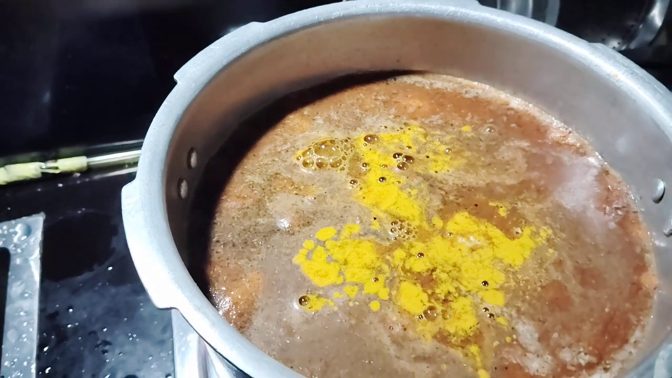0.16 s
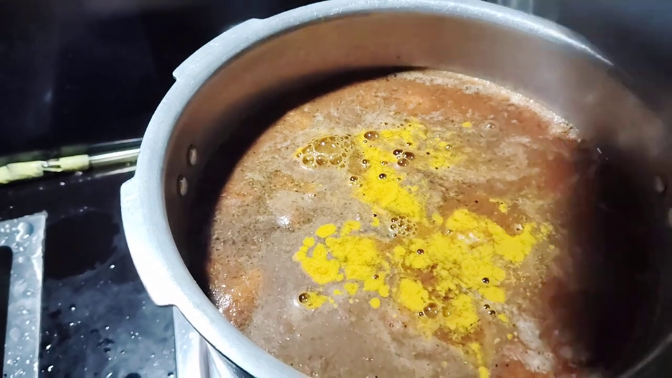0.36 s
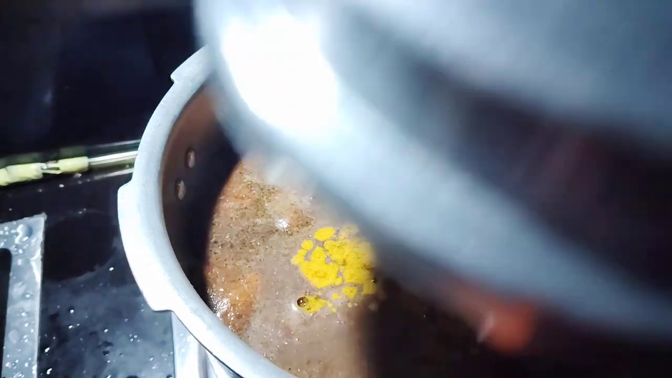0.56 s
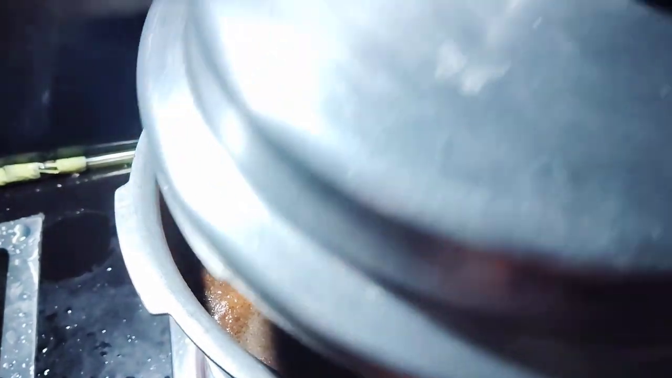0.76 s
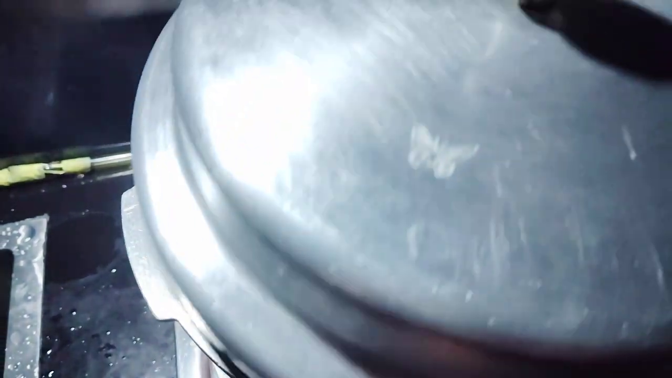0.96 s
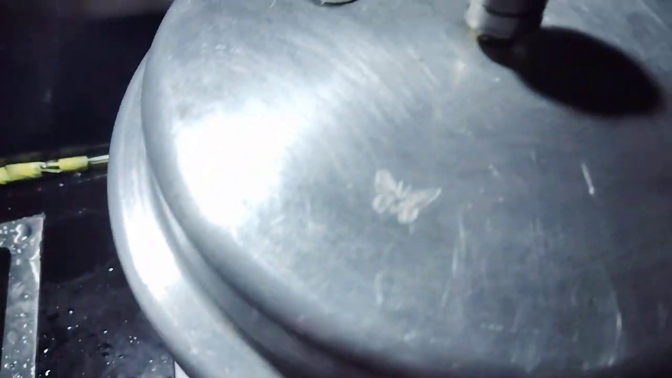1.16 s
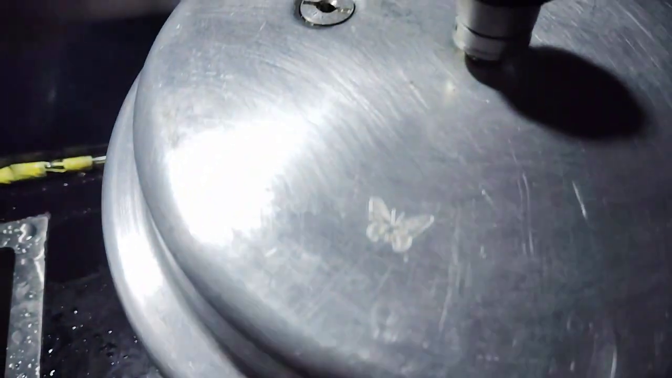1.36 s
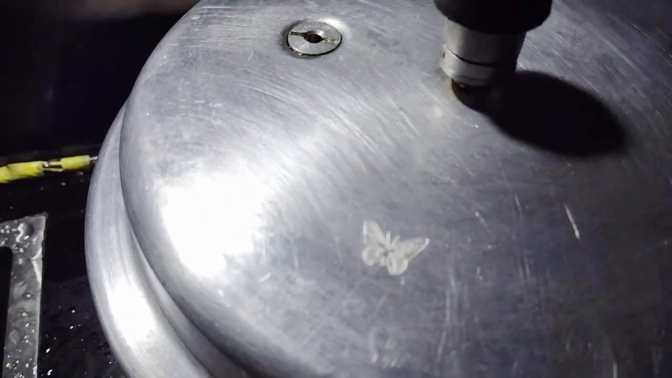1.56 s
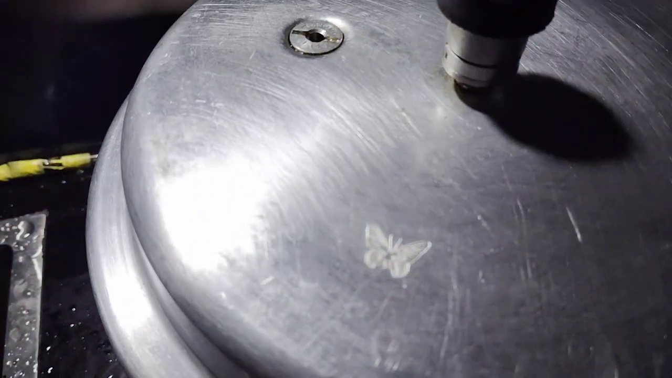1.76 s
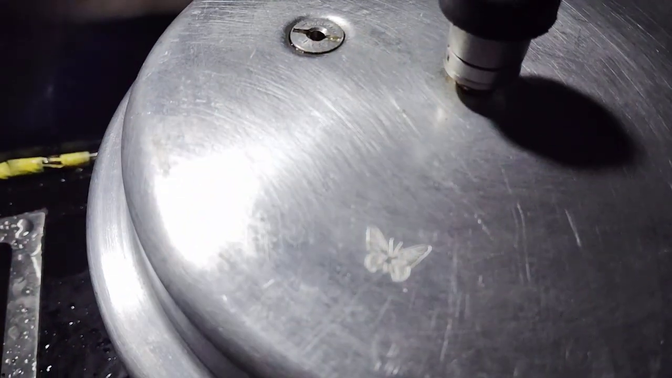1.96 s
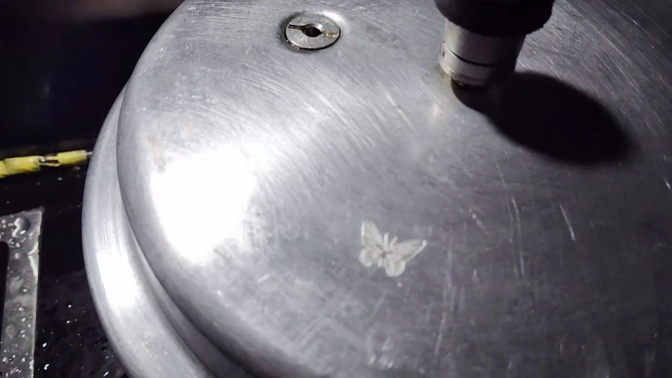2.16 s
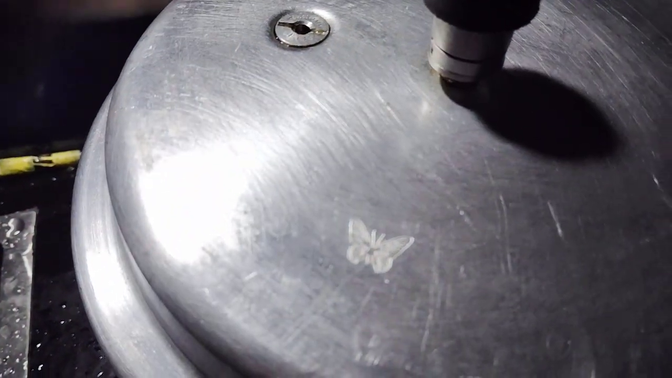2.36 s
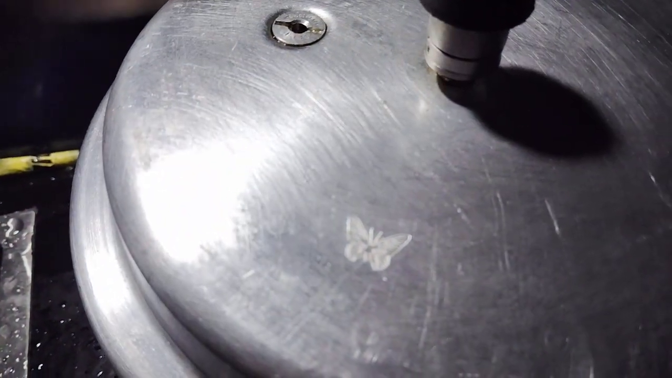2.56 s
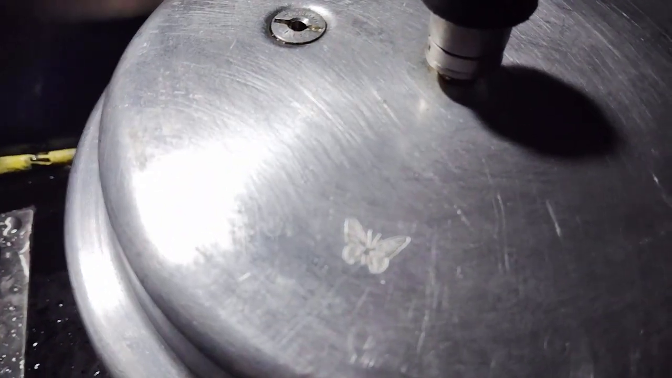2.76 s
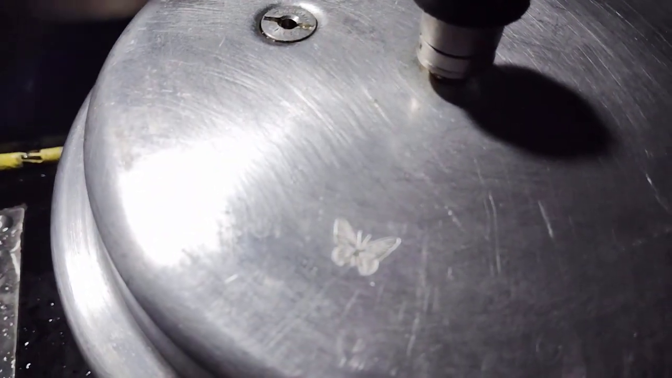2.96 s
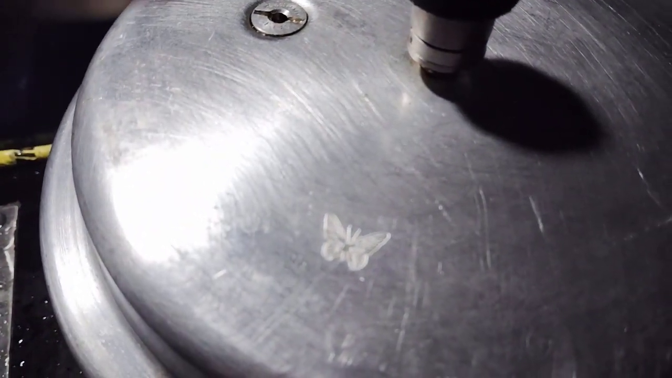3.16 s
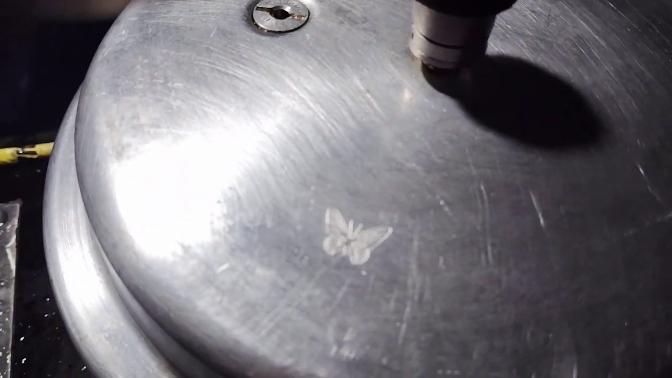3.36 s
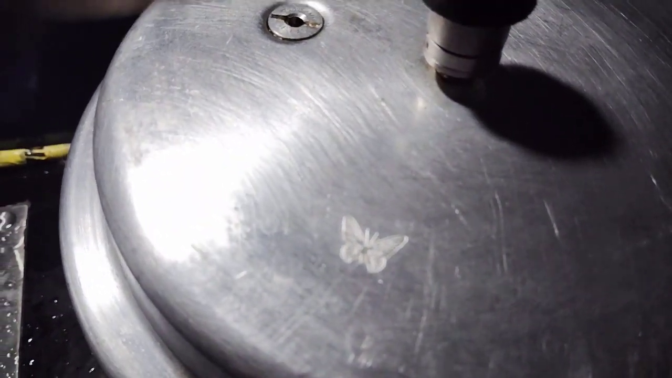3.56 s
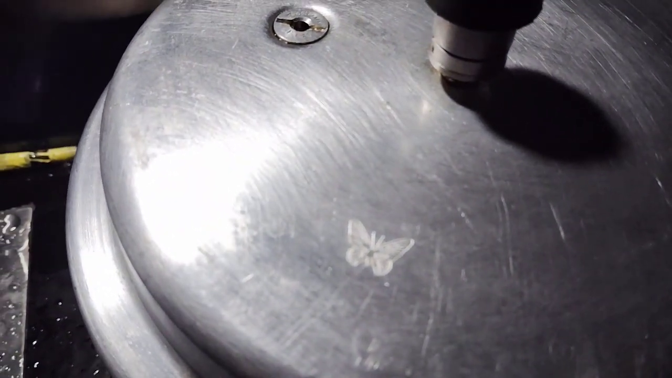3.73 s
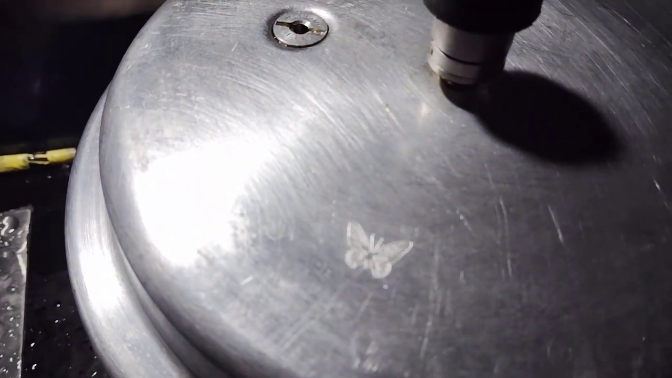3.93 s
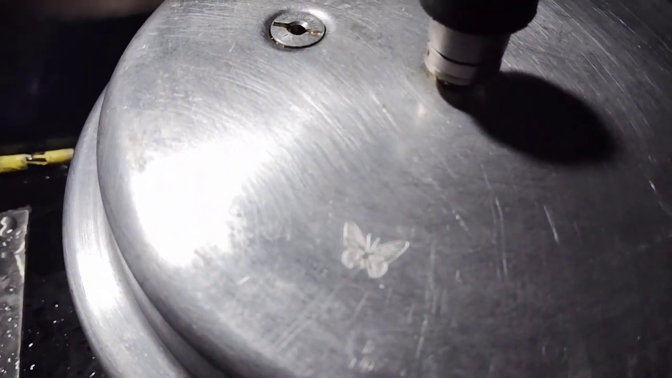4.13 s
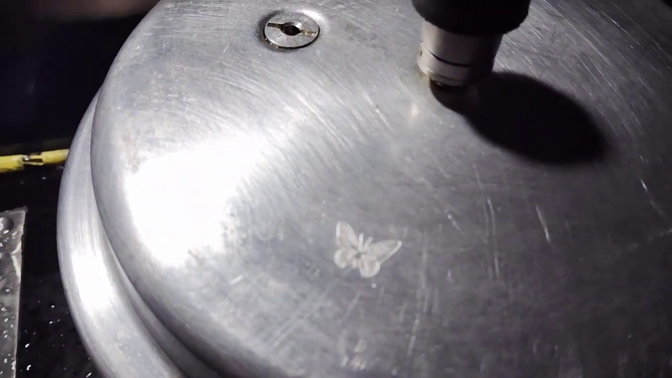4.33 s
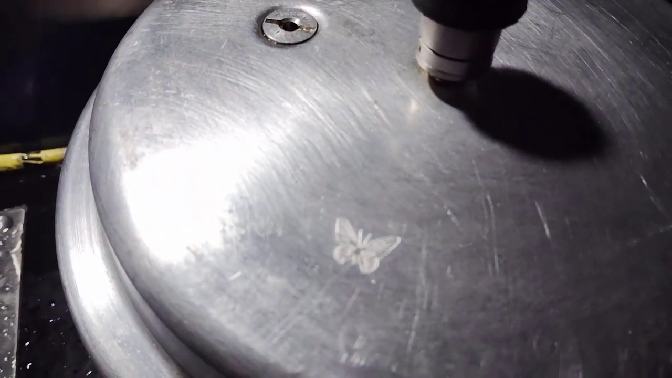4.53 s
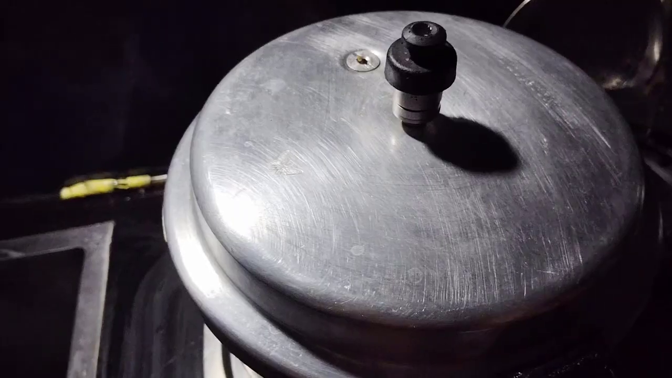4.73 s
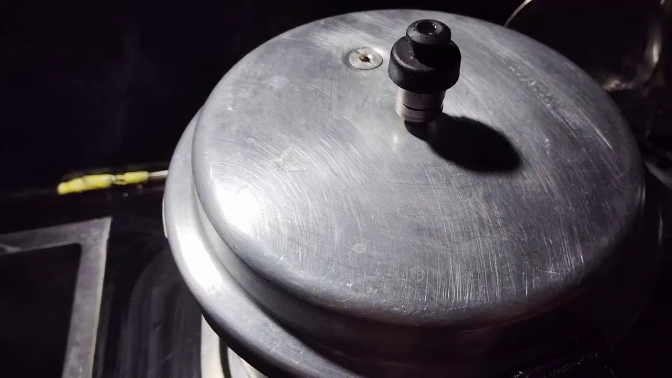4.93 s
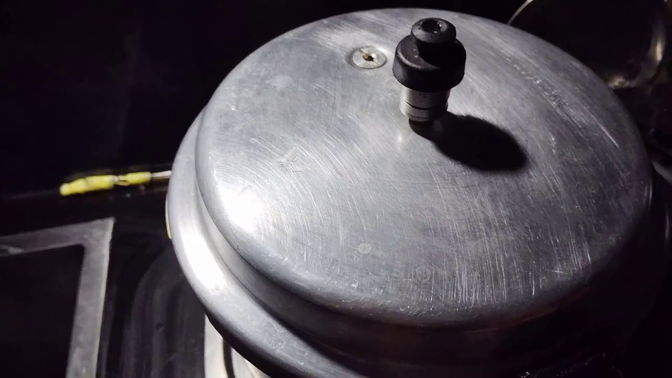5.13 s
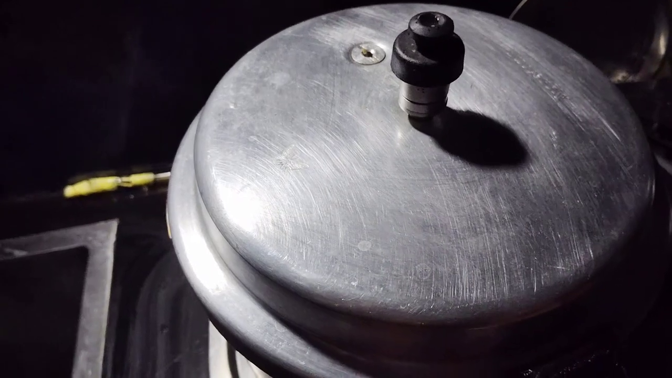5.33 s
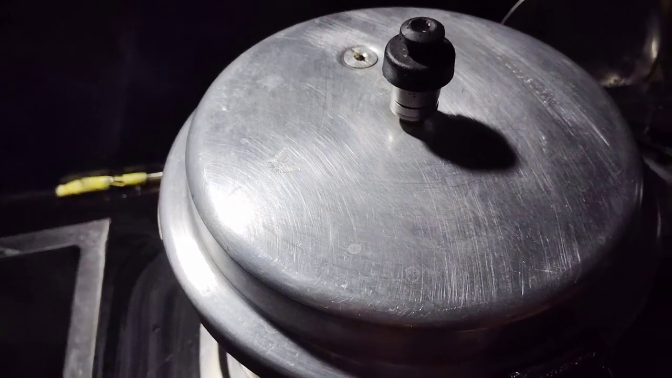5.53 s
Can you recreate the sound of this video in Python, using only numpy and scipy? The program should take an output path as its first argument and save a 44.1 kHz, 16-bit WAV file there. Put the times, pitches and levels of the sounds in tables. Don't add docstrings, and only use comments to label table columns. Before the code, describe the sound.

A close microphone in a small, hard kitchen hears steady burner hiss, low murmur and faint metallic crackle. Distant utensils knock lightly from 0.25 s, and a dull thump booms through the worktop near 0.37 s. At 1.03 s a steel lid strikes a full pot in a rapid, damped clatter, then rocks with low wavering tones and a grinding rumble. At 1.4 s it seats with the loudest clank, dome and rim ringing briefly. A sharp click at 1.76 s starts a thin, gritty turning scrape, with more clicks until about 2.4 s. Soft thumps boom at 2.07, 3.17, 3.58 and 4.11 s, among dull and bright utensil knocks, one ringing longer at 3.8 s. Sound cuts to silence at 4.28 s. From 4.6 s a much quieter, duller room fades in, with weak hiss, low boom, tiny ticks and faint knocks until about 5.6 s.

```python
import sys
import numpy as np
from scipy import signal
from scipy.fft import rfft, irfft, next_fast_len
from scipy.io import wavfile
from scipy.ndimage import uniform_filter1d

SR = 44100
rng = np.random.default_rng(int(sys.argv[2]) if len(sys.argv) > 2 else 0)


def unload_audio(sound):
    columns = np.transpose(np.atleast_2d(sound))
    steps = np.round(np.clip(columns, -1, 1) * 32767)
    wavfile.write(sys.argv[1], SR, steps.astype(np.int16))


def ratio(d):
    e = np.asarray(d, float) / 20
    return 10 ** e


N = 246735
TIME = np.arange(N) / SR

# start in [s], clank level in [dB], dome blow level in [dB],
# rim tick level in [dB], clank pitch in [Hz].
CONTACTS = [(1.0330, -20.5, -19.5, -42.5, 1243), (1.0377, -13.5, -29, -23.5, 1616),
            (1.0377, -13, -20.5, -27.5, 757), (1.0415, -16, -27, -25, 700), (1.0495, -21, -35.5, -39, 600),
            (1.0512, -23, -40.5, -27.5, 604), (1.061, -30, -39.5, -45.5, 525.6),
            (1.0731, -30, -37, -33.5, 640), (1.1340, -34, -37.5, -59, 1240),
            (1.192, -30, -33.5, -52.5, 1160), (1.343, -28, -34, -57, 1272), (1.354, -28, -33.5, -61, 650),
            (1.4, -40, -30.5, -41, 1500), (1.4015, -10.5, -10.5, -18, 1283),
            (1.4033, -18.5, -16.5, -22.5, 887), (1.411, -17, -15.5, -29.5, 836),
            (1.415, -20, -21.5, -23.5, 1100), (1.4210, -21.5, -33, -30.5, 895),
            (1.426, -23.5, -22, -32, 613), (1.438, -35.5, -26.5, -32.5, 1000)]
# start in [s], peak level in [dB].
THUMPS = [
    (0.366, -22),
    (2.065, -24.5),
    (3.172, -24.5),
    (3.579, -24),
    (4.111, -25.5),
]


def level(x, db):
    return x * ratio(db) / np.sqrt(np.mean(x ** 2))


def band(x, low_hz, high_hz):
    return signal.sosfilt(signal.butter(2, [low_hz, min(high_hz, 0.45 * SR)], "band", fs=SR, output="sos"), x)


def decay(after, t60):
    return np.exp(-np.log(1000) * after / t60)


def walk(rate):
    k = int(SR / rate)
    steps = np.repeat(rng.standard_normal(N // k + 1), k)
    return 1.3 * uniform_filter1d(uniform_filter1d(steps, k), k)[:N]


def waver(hz, drift_hz):
    return np.sqrt(2) * np.sin(2 * np.pi * np.cumsum(hz + drift_hz * walk(14)) / SR)


def swells(rows, rise_s, t60):
    power = np.zeros(N)
    for s, hold, db in rows:
        rise = np.clip((TIME - s) / rise_s, 0, 1)
        fall = ratio(-60 * np.clip(TIME - s - rise_s - hold, 0, None) / t60)
        power += (ratio(db) * rise * fall) ** 2
    return np.sqrt(power)


def ring(push, modes):
    out = np.zeros(len(push))
    for hz, db, t60 in modes:
        pole = np.exp(2j * np.pi * hz / SR - np.log(1000) / (max(t60, 0.005) * SR))
        out += ratio(db) * signal.lfilter([0, pole.imag], [1, -2 * pole.real, abs(pole) ** 2], push)
    return out


def blows(times, db, contact_s, rattle, rattle_s):
    out = np.zeros(N)
    after = np.arange(2000) / SR
    push = np.sin(np.pi * np.clip(after / contact_s, 0, 1))
    grit = rng.standard_normal((len(times), len(after))) ** 3 * np.exp(-after / rattle_s)
    for s, gain, trail in zip(times, ratio(np.array(db)), grit):
        i = int(s * SR)
        out[i:i + len(after)] += (gain * (push / push.sum() + rattle * trail))[:N - i]
    return out


def strike(times, db, modes, spread, count):
    start, push = SR, np.zeros(SR)
    out = np.zeros(N)
    chance = rng.standard_normal((len(times), len(modes), count))
    chance = np.sign(chance) * (0.6 + 0.4 * np.abs(chance)) * 0.75 ** np.arange(count)
    detune = rng.uniform(-1.3, 1, (len(modes), count)) * (np.arange(count) > 0)
    for m, (hz, mode_db, t60) in enumerate(modes):
        for k in range(count):
            push[(times * SR).astype(int) - start] = ratio(db) * chance[:, m, k]
            out[start:2 * start] += ring(push, [(hz * (1 + spread * detune[m, k]), mode_db, t60)])
    return out


def lid_ring():
    # pitch in [Hz], level in [dB], t60 in [s].
    dome_modes = [(239.4, 0.5, 0.15), (289.4, -4, 0.22), (357.6, 1, .19), (495, -2, 0.12), (558, -12, .14),
                  (653, -8.5, 0.25), (713.5, -6, 0.075), (847, -3, 0.12), (921, -8, 0.051), (1170, -4, 0.1),
                  (1220, -5.5, 0.04), (1414, -5, 0.078), (1565, -7, 0.11), (1860, -10.5, 0.11),
                  (2085, -15, 0.16), (2205, -13, 0.16), (2450, -16.5, 0.13)]
    # pitch in [Hz], level in [dB], t60 in [s].
    rim_modes = [(3100, -5.5, 0.044), (3584, -8.5, 0.038), (4020, -11, .22), (4160, -0.5, 0.12),
                 (4330, 4.5, 0.078), (4953, -8, 0.13), (5650, -3.5, .06), (6000, -17, .05),
                 (6600, -14.5, .08), (7300, -9.5, 0.054), (8490, 1, 0.072), (8900, 0, 0.19),
                 (8870, -7.5, 0.11), (9125, -7.5, .1), (9600, -8.5, 0.065), (9700, -4.5, 0.064),
                 (10040, -6.5, .1), (10500, -14.5, 0.09), (12500, -14, 0.092), (12700, -12.5, .12),
                 (13400, -13.5, .1), (14400, -14, .12)]
    s, _, blow_db, tick_db, _ = np.transpose(CONTACTS)
    held_until_s, held_ring = 1.3, 0.55
    out = np.zeros(N)
    for group, share in [(s < held_until_s, held_ring), (s >= held_until_s, 1)]:
        held_dome = dome_modes * np.array([1, 1, (1 + share) / 2])
        held_rim = rim_modes * np.array([1, 1, share])
        out += strike(s[group], blow_db[group] - 10, held_dome, 0.035, count=3)
        out += strike(s[group], tick_db[group] - 15, held_rim, 0.045, count=5)
    return out


def lid_clank():
    out = np.zeros(N)
    impulse = np.arange(2000) == 0
    for s, db, _, _, hz in CONTACTS:
        i = int(s * SR)
        out[i:i + 2000] += ring(impulse, [(hz, db, 22 / hz), (1.4 * hz, db - 4, 22 / hz)])
    return out


def lid_wash():
    s, _, blow_db, tick_db, _ = np.transpose(CONTACTS)
    washes = [(blow_db - 18, 450, 3200, 0.17),
              (tick_db - 7.5, 2600, 11000, 0.03),
              (tick_db - 19, 8000, 15000, 0.07)]
    out = np.zeros(N)
    for db, low_hz, high_hz, t60 in washes:
        hits = np.bincount((s * SR).astype(int), ratio(2 * db), N)
        energy = signal.lfilter([1], [1, -np.exp(-2 * np.log(1000) / (t60 * SR))], hits)
        out += np.sqrt(energy) * level(band(rng.standard_normal(N), low_hz, high_hz), 0)
    return out


def lid_rocking():
    # start in [s], hold in [s], level in [dB].
    rolls = [
        (1.14, 0.025, -35),
        (1.2, 0.038, -40),
        (1.262, 0.013, -43),
        (1.295, .012, -44.5),
        (1.325, 0.05, -30),
    ]
    grind = level(band(rng.standard_normal(N), 320, 680), -6.5)
    upper = ratio(-15) * (waver(357, 5.5) + waver(645, 8.2))
    return (waver(230, 5.5) + upper + grind) * swells(rolls, rise_s=0.013, t60=0.064)


def lid_scrape():
    # start in [s], hold in [s], level in [dB].
    shoves = [
        (1.762, 0.0034, -45.5),
        (1.78, 0.45, -55),
        (2.175, 0.013, -51.5),
        (2.21, .2, -62),
    ]
    # pitch in [Hz], level in [dB], t60 in [s].
    scrape_modes = [(1600, 4, 0.016), (3134, 4, 0.029), (3460, 3, 0.036), (3930, -5, 0.034),
                    (5520, -5, 0.042), (5920, -3.5, 0.04), (9100, 10, 0.028), (10640, 5, 0.014),
                    (12100, -6, .012)]
    grit = rng.standard_normal(N) * ratio(1.8 * walk(120))
    scrape = level(ring(grit, scrape_modes), -1.5)
    scrape += level(band(grit, 1500, 6000), -1) + level(band(grit, 8200, 13000), -1)
    return scrape * swells(shoves, rise_s=0.0015, t60=0.1)


def clicks():
    # start in [s], peak level in [dB], share of the lower band in [dB].
    click_events = [(0.6574, -48, -18), (0.7083, -41, -18), (1.7642, -21, -14.5), (1.7806, -30, -24),
                    (1.8465, -36, -17), (2.0173, -31, -26), (2.1844, -39, -14), (2.212, -34, -7.5),
                    (2.2593, -37, -10.5), (2.3794, -38, -11), (2.8364, -42, -10), (2.8694, -39, -8.5),
                    (2.9956, -39, -20), (3.286, -39, -27), (4.1584, -39, -19), (4.229, -36.5, -15),
                    (4.65, -41.5, -10), (4.6932, -50, -19), (4.7541, -48, -12), (4.766, -48, -12),
                    (4.778, -43.5, -7), (4.8349, -46, -24), (4.9048, -53, -18), (5.037, -44, -22),
                    (5.077, -52, -22), (5.2174, -56, -20), (5.2694, -51, -15), (5.378, -55, -22),
                    (5.4308, -44, -20), (5.56, -45, -21)]
    out = np.zeros(N)
    after = np.arange(3000) / SR
    for s, db, lower_db in click_events:
        noise = rng.standard_normal(len(after))
        upper_db = 10 * np.log10(max(1 - ratio(2 * lower_db + 8), 0.05))
        tick = level(band(noise, 8200, 12800), upper_db) + level(band(noise, 2000, 6200), lower_db + 6)
        i = int(s * SR)
        out[i:i + len(after)] += (ratio(db - 9) * tick * decay(after, 0.032))[:N - i]
    return out


def crackle():
    ticks_per_s, base_db, scatter_db = 33, -68, 2.5
    out = np.zeros(N + 2000)
    after = np.arange(2000) / SR
    for at, tone, size in rng.random((int(ticks_per_s * N / SR), 3)):
        low_hz = 7500 + 4500 * tone
        noise = band(rng.standard_normal(len(after)), low_hz, 1.4 * low_hz)
        tick = level(noise, base_db - scatter_db * np.log(size))
        i = int(at * N)
        out[i:i + len(after)] += tick * decay(after, 0.025)
    return out[:N]


def rustles():
    # centre time in [s], rms level in [dB], centre pitch in [Hz], length in [s].
    rustle_events = [
        (0.522, -56.5, 2260, 0.043),
        (1.147, -47, 920, 0.012),
        (1.347, -44, 1140, 0.044),
        (2.875, -55.5, 1490, 0.02),
        (4.004, -71, 6730, 0.62),
        (4.233, -52, 1850, 0.061),
        (5.456, -60.5, 9500, 0.014),
    ]
    out = np.zeros(N)
    for s, db, hz, length in rustle_events:
        noise = band(rng.standard_normal(N), hz / 1.5, hz * 1.5)
        out += level(noise, db) * np.exp(-((TIME - s) / length) ** 2)
    return out


def pounding():
    # pitch in [Hz], level in [dB], t60 in [s].
    worktop_modes = [(233, -5.5, 0.19), (261.7, -3.5, 0.1), (343, -17.5, 0.086), (626, -2.5, 0.011),
                     (1000, -15.5, 0.12)]
    s, db = np.transpose(THUMPS)
    edge = ring(blows(s - 0.004, db - 21, 0.00031, 0.0026, 0.0042), [(1100, 0, 0.0079), (700, 0, 0.096)])
    body = ring(blows(s, db, 0.00093, 0.00099, 0.0079), worktop_modes)
    return edge + ratio(-1) * body


def knocks(events, split):
    out = np.zeros(N)
    for s, db, hz, t60 in events:
        i = int(s * SR)
        push = blows([s], [0], 0.00011, 0.05, 0.014)[i:i + SR // 2]
        sound = ring(push, [(hz, 0, t60), (hz * (1 + split), -1, 0.55 * t60),
                            (hz * (1 - split / 2), -7, 0.4 * t60), (hz * (1 + 2 * split), -8, 0.11 * t60)])
        out[i:i + SR // 2] += ratio(db) * sound / np.abs(sound).max()
    return out * ratio(2.4 * walk(90))


def utensils():
    # start in [s], peak level in [dB], pitch in [Hz], t60 in [s].
    low_knocks = [(.747, -37, 402, 0.08), (2.109, -33, 376, 0.07), (2.868, -40, 840, 0.059),
                  (3.089, -42, 350, 0.095), (3.315, -44, 257, 0.077), (3.943, -40.5, 298, .07),
                  (4.232, -33.5, 367, 0.083), (4.757, -52, 458, 0.054), (4.922, -46, 662, 0.13)]
    high_knocks = [(.248, -48, 1580, .11), (.303, -47.5, 1456, 0.11), (.506, -40, 1690, 0.043),
                   (.81, -45, 1100, .07), (2.868, -44, 2380, 0.051), (3.611, -40, 2360, 0.034),
                   (2.782, -53, 5500, .05), (3.005, -51, 3620, 0.071), (3.789, -32.5, 1490, 0.36),
                   (4.226, -39, 2340, 0.045), (4.608, -39, 1548, 0.12), (4.86, -63, 2450, .08),
                   (4.921, -49, 1770, .07), (4.95, -58, 1940, 0.19), (5.24, -49.5, 1317, 0.21),
                   (5.445, -56.5, 4050, 0.052)]
    return knocks(low_knocks, 0.092) + knocks(high_knocks, 0.074)


def room(x):
    t60, tail_db = 0.5, -19.5
    after = np.arange(int(0.5 * SR)) / SR
    noise = rng.standard_normal(len(after)) * (after > 0.004)
    tail = band(noise, 120, 4200) * decay(after, t60) + 0.5 * noise * decay(after, t60 / 2)
    return x + ratio(tail_db) * signal.fftconvolve(x, tail / np.sqrt(np.sum(tail ** 2)))[:N]


def boom():
    # start in [s], level in [dB].
    bump_events = [(0, -42.5), (.27, -49), (1.045, -38), (1.14, -35.5), (1.42, -34), (1.51, -39.5),
                   (1.6, -47), (1.82, -52), (2.45, -66), (2.58, -48), (2.79, -51), (3.92, -49), (4.21, -63),
                   (4.75, -54), (4.85, -48.5), (4.93, -47.5), (4.999, -43), (5.07, -48.5), (5.26, -46),
                   (5.35, -48), (5.49, -47.5)]
    bumps = swells([(s, 0, db) for s, db in bump_events], rise_s=0.021, t60=0.26)
    thumps = swells([(s, 0, db - 15.5) for s, db in THUMPS], rise_s=0.015, t60=0.82)
    idle = ratio(-62.5 + walk(3.5))
    return waver(114.7, 4.16) * np.sqrt(bumps ** 2 + thumps ** 2 + idle ** 2)


def kitchen():
    # frequency in [Hz], level in [dB per Hz].
    murmur_spectra = [
        [(15, -53), (25, -15), (80, -21.5), (93, -14), (114, 4), (167, -7.5), (279, -1), (312, -8.5), (349, -5),
         (477, -10), (953, -15.5), (1300, -21), (1590, -13), (2180, -21.5), (5200, -34.5), (6760, -58),
         (11400, -120)],
        [(12, -30), (20, -5), (35, -42.5), (60, -36), (91, -25), (132, 0.5), (182, -19), (241, -7.5),
         (452, -23), (597, -21), (1040, -26), (1910, -27), (5200, -38), (6760, -79), (11400, -120)],
    ]
    hiss_spectra = [
        [(1470, -31), (2500, -1.5), (2830, -5), (3080, -1.5), (4630, -7), (6210, -4.5), (7480, -4.5), (9640, 2),
         (11300, -4), (12200, -7.5), (14000, -8.5), (15800, -12)],
        [(1470, -32), (2500, -2), (2740, -0.5), (3850, -3.5), (4420, -6.5), (6760, -9.5), (8930, -2),
         (10900, -7), (15800, -8)],
    ]
    # first view's level in [dB], its drift in [dB/s], later view's level in [dB], its drift in [dB/s].
    background = [
        (-51.5, 0.25, -58, -2),
        (-57, 1.17, -69, -3),
        (-57, 0.4, -70, -3),
    ]
    flicker_db = 0.7
    later = TIME > 4.4
    size = next_fast_len(N)
    hz = np.arange(size // 2 + 1) * SR / size + 1
    white = rfft(rng.standard_normal(size))
    centres = 20 * 2 ** np.arange(0, 10.5, 0.5)
    # spectra, band centres, and the range in Hz that sets the level
    layers = [(murmur_spectra, centres[:12], 150, 1000),
              (murmur_spectra, centres[12:15], 1200, 2800),
              (hiss_spectra, centres[15:], 5500, 15000)]
    out = np.zeros(N)
    for (spectra, bands, low_hz, high_hz), levels in zip(layers, background):
        first_db, first_drift, later_db, later_drift = levels
        shapes = []
        for spectrum in spectra:
            point_hz, point_db = np.transpose(spectrum)
            shapes.append(ratio(np.interp(np.log(hz), np.log(point_hz), point_db)))
        layer = np.zeros(N)
        for centre in bands:
            window = white * np.cos(np.pi * np.clip(np.log2(hz / centre), -0.5, 0.5)) ** 2
            first, second = (irfft(window * shape, size)[:N] for shape in shapes)
            layer += np.where(later, second, first) * ratio(flicker_db * (walk(4) + walk(10)))
        power = band(layer, low_hz, high_hz) ** 2
        rms = np.sqrt(np.where(later, power[later].mean(), power[~later].mean()))
        first_swell = first_db + first_drift * (TIME - 2.1)
        later_swell = later_db + later_drift * (TIME - 5.15)
        out += layer * ratio(np.where(later, later_swell, first_swell) + flicker_db * walk(110)) / rms
    return out


def scene():
    lid = lid_ring() + lid_clank() + lid_wash() + lid_rocking() + lid_scrape()
    near = lid + clicks() + crackle() + rustles() + pounding() + utensils()
    near = signal.sosfilt(signal.butter(6, 110, "high", fs=SR, output="sos"), room(near))
    return (near + boom() + kitchen())[None]


def roll_off(x):
    return signal.sosfilt(signal.butter(12, 16810, fs=SR, output="sos"), x)


def record(dry):
    before = np.clip((4.279 - TIME) / 0.0026, 0, 1)
    after = np.clip((TIME - 4.602) / 0.22, 0, 1)
    heard = signal.sosfilt(signal.ellip(12, 0.2, 80, 15800, fs=SR, output="sos"), dry)
    return roll_off(heard * (before + after))


dry = scene()
out = record(dry)
unload_audio(out)
```